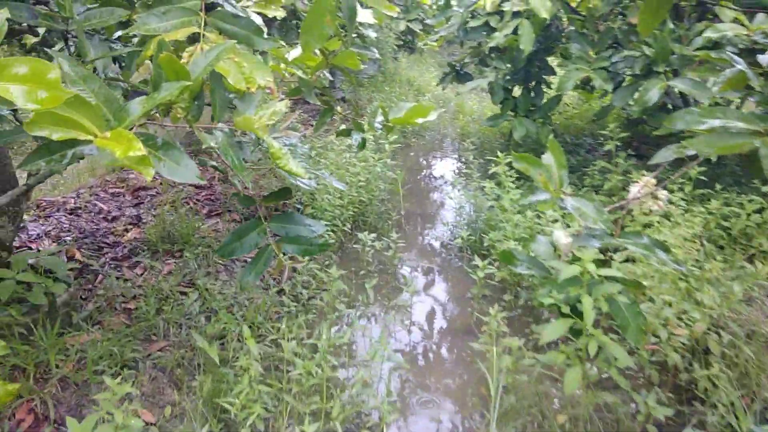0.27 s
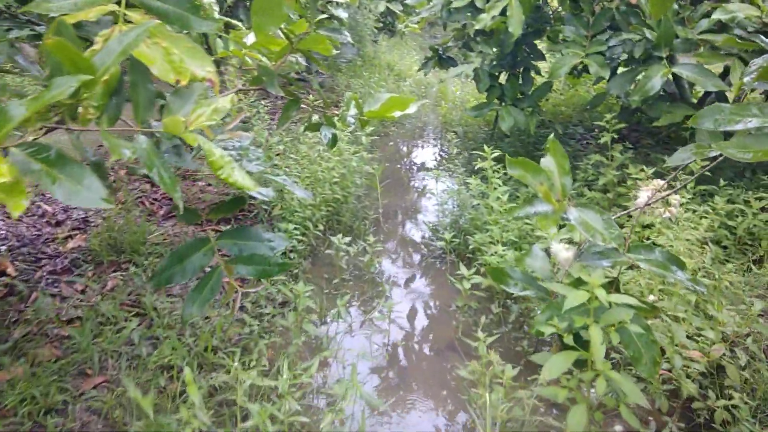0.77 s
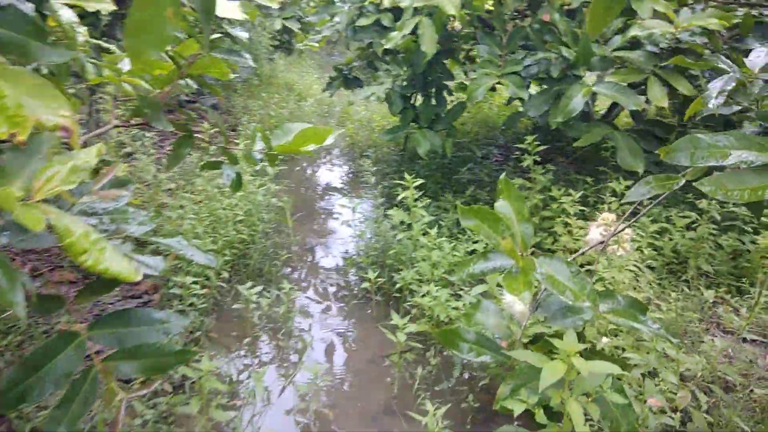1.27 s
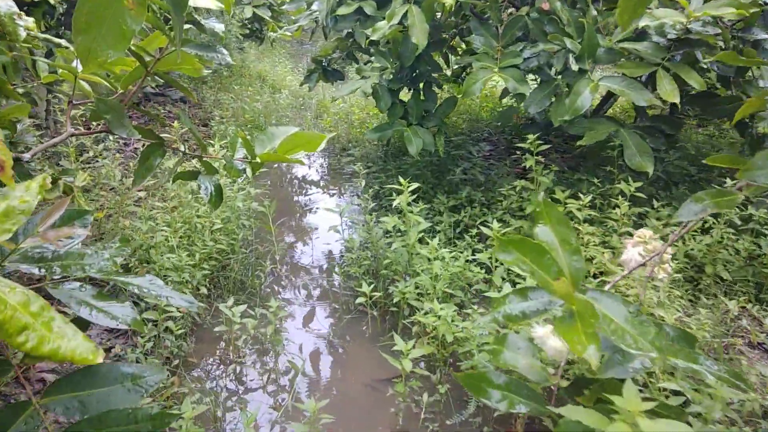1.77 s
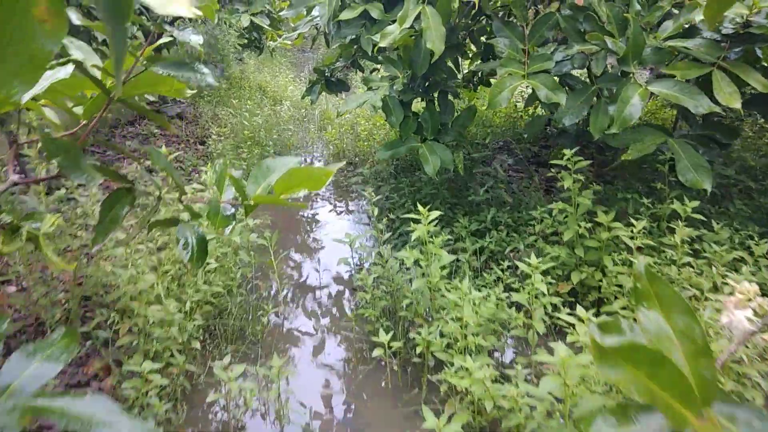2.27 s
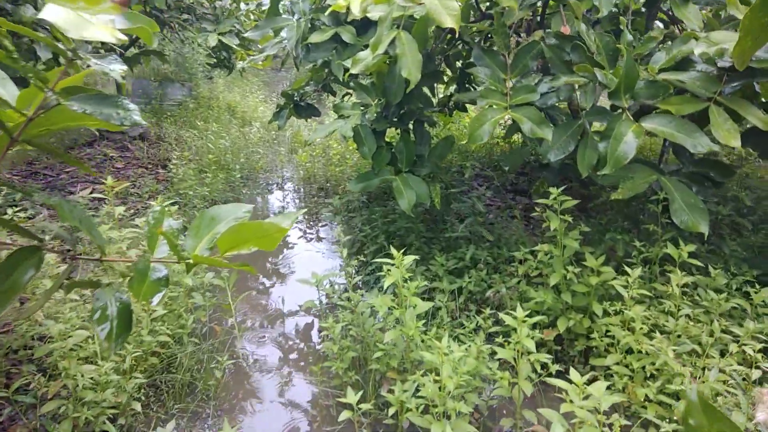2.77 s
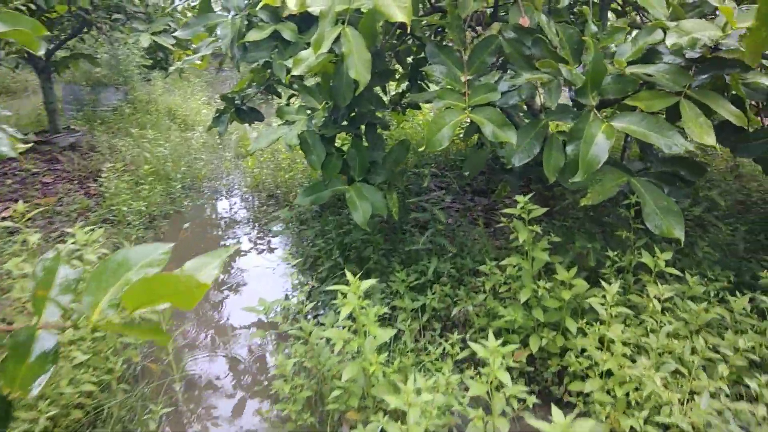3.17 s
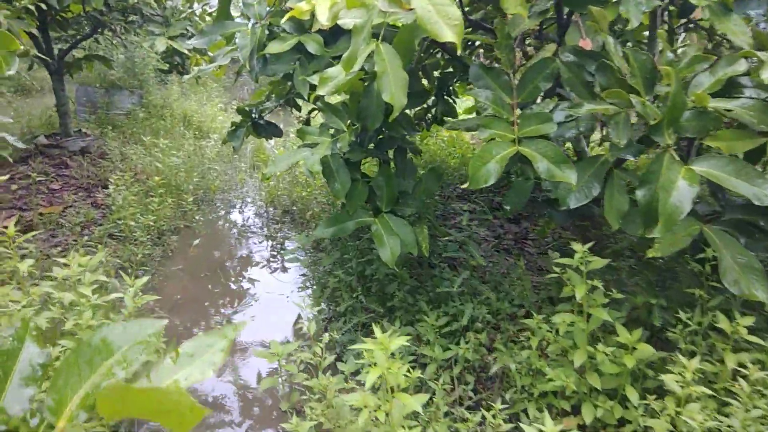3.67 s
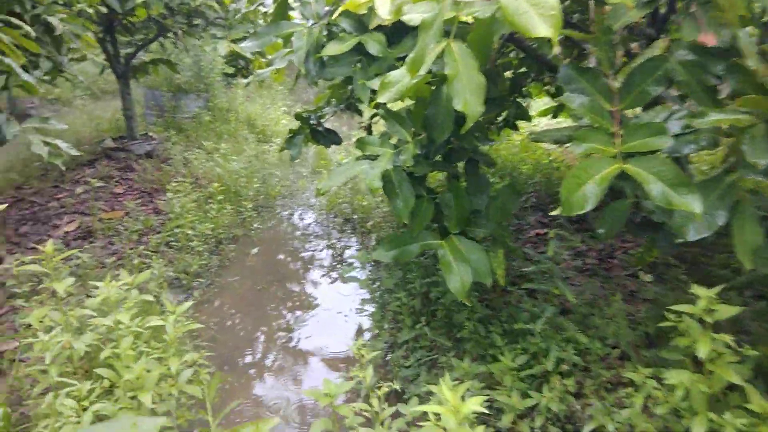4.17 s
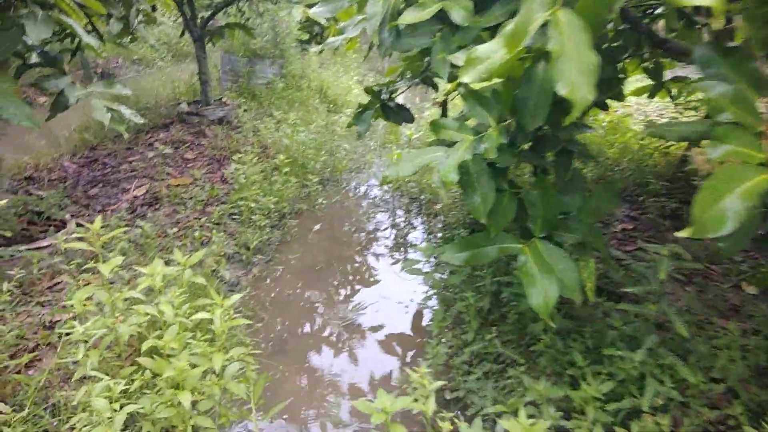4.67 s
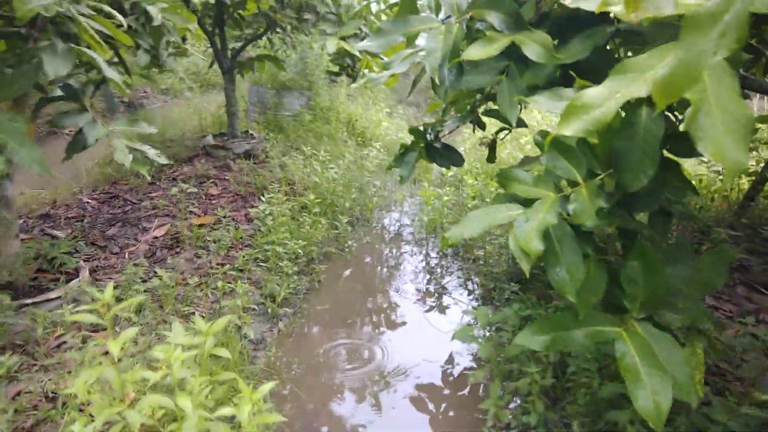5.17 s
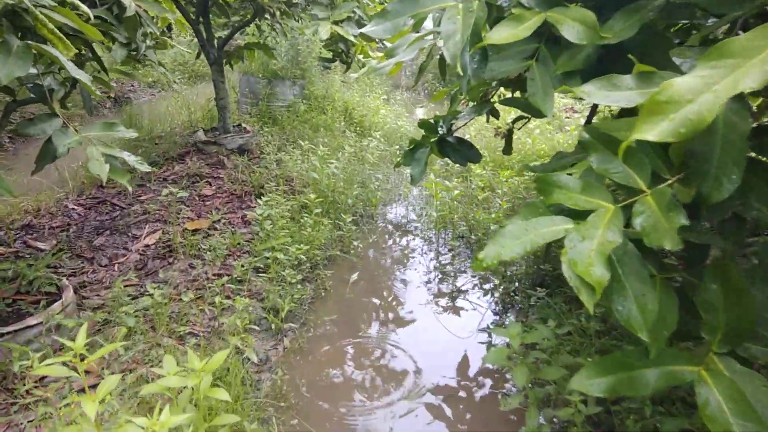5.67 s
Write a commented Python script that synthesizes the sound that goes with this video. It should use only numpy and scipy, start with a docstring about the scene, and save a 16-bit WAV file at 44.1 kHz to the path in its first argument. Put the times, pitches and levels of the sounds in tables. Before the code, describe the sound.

Six seconds of wading in a flooded, leafy garden, heard close to the feet in stereo. The tail of one stride swishes at the start with a few hollow bubbles, while a distant bird gives faint, low, sinking coos until about 1 s. A strong splash comes near 0.9 s, with bright bubble pops and a sharp drop snap. Further strides follow around 1.7, 2.8, 3.9, 4.8 and 5.6 s: each sucks loose with rising bloops, drags through water and weeds in a fine fizzy spray, then plunges with a low gulp. The stride from 2.7 to 3.3 s is full and splashy; sharp splashes spike near 4.07 and 5.06 s. Tiny wet rustles fill the quieter gaps near 1.4, 2.5, 3.4 and 4.5 s. A very high, throbbing insect buzz is clearest from 1 to 2.6 s, then weakens. Faint air and low rumble remain beneath, swelling slightly near 2.8 s.

```python
"""Wading a flooded garden furrow

Someone wades along a flooded garden furrow, about one stride a second, carrying a two-port microphone.
Each foot sucks out with hollow bubbles (gliding sines), drags through water and wet weeds in a spray of
tiny grains (clicks ringing resonators) and plunges in; drops snap and stems rustle (bands of noise).
An insect buzzes high up (pulsed resonant noise), a far bird coos low at the start (a blurred sine),
and a faint outdoor rumble (resonant noise) and air (noise in bands) lie below."""
import sys
import numpy as np
from scipy import signal
from scipy.io import wavfile

SR = 44100
rng = np.random.default_rng(int(sys.argv[2]) if len(sys.argv) > 2 else 0)


def store_pcm(level_fs):
    """Save levels as 16-bit WAV."""
    pcm = np.round(np.clip(level_fs, -1, 1) * 32767).astype(np.int16)
    wavfile.write(sys.argv[1], SR, np.atleast_2d(pcm).T)


def gain_from_db(level_db):
    """Convert decibel levels to linear amplitude factors (20 dB per decade)."""
    decades = np.asarray(level_db, float) / 20
    return 10 ** decades


N = 261072

# Strides: the foot dragging through water and weeds, close below the microphone.
# Each row: full at seconds, level in dB, rise in s, hold in s, fall in s; rise and fall span 20 dB.
STRIDES = [(0, -41.5, .1, 0.16, 0.12), (0.643, -44.5, 0.055, 0.49, 0.15), (1.659, -42.5, 0.088, 0.4, 0.16),
           (2.698, -38.5, 0.0043, 0.43, 0.2), (3.774, -39.5, 0.027, 0.28, 0.18),
           (4.713, -40, 0.12, 0.33, 0.17), (5.626, -43.5, 0.13, 0.32, .15)]
# Splashes and swishes within the strides. Each row: full at seconds, level in dB, rise in s, fall in s.
SPLASHES = [(.8, -42.5, 0.14, 0.071), (0.895, -28, 0.021, 0.11), (1.109, -48, 0.015, 0.016),
            (1.235, -46, 0.002, 0.021), (1.589, -49.5, 0.035, .2), (1.785, -34.5, 0.13, 0.092),
            (2.08, -36.5, 0.12, 0.064), (2.575, -56.5, 0.004, 0.6), (2.86, -39, 0.17, 0.15),
            (3.12, -34.5, 0.16, 0.015), (3.66, -56, 0.036, 0.54), (4.069, -31, 0.001, 0.014),
            (4.198, -45.5, 0.002, 0.034), (4.733, -40, 0.004, 0.28), (5.06, -27.5, 0.002, 0.0097),
            (5.515, -50.5, 0.034, .3), (5.647, -34, 0.062, 0.036), (5.813, -36.5, 0.011, 0.092)]
# Gain of the fine spray, before the force of the drag alters it. Each row: time in seconds, gain in dB.
FINE_SPRAY = [(0, -2.5), (.7, -0.5), (1.9, 1), (3, -.5), (4, 0.5), (4.8, -2), (5.7, 0)]
# Spectrum of the water grains. Each row: frequency in Hz, relative density in dB per Hz.
GRAIN_SPECTRUM = [(1400, -7), (3000, -5), (5000, -1.5), (7500, -3), (10000, -3.5), (12000, -4), (15500, -5)]
# Air sloshing round the foot. Each row: full at seconds, level in dB, rise in s, hold in s, fall in s.
SLOSHES = [(0, -53.5, 0.19, 0.016, 0.086), (0.55, -60, 0.0054, 0.11, 0.09),
           (0.889, -40, 0.0046, 0.012, 0.11), (1.43, -62, .003, 0.2, 0.24),
           (1.767, -40.5, 0.0029, 0.0045, 0.14), (1.999, -47.5, 0.06, 0.031, 0.15),
           (2.552, -49, 0.11, 0.31, 0.16), (2.803, -44, 0.032, 0.013, 0.59),
           (3.619, -47, 0.018, 0.23, 0.037), (3.864, -41.5, 0.0018, 0.057, 0.22),
           (4.07, -61.5, 0.045, 0.095, 0.12), (4.585, -46, 0.11, 0.42, 0.21),
           (5.475, -43, 0.032, 0.33, 0.29)]
# Big air pockets as the foot plunges or pulls free.
# Each row: full at seconds, level in dB, rise in s, fall in s.
PLUNGES = [(0.921, -48, 0.081, 0.14), (1.985, -65.5, 0.019, 0.18), (2.818, -54, 0.036, 0.16),
           (3.877, -43, 0.0063, 0.18), (4.709, -48.5, 0.092, 0.1), (5.66, -47.5, 0.11, 0.13)]
# The far bird, one row a coo. Each row: full at seconds, level in dB, pitch in Hz.
COOS = [(0, -59, 358), (.23, -54.5, 346), (0.549, -53, 338), (0.862, -53.5, 328)]
# The insect's slow swell. Each row: time in seconds, level in dB.
INSECT_LEVEL = [(0, -93), (.5, -68.5), (1.0, -57.5), (2.6, -59), (3.5, -67), (5.92, -71.5)]
# Spectrum of the outdoor air. Each row: frequency in Hz, relative density in dB per Hz.
AIR_SPECTRUM = [(30, -3), (60, 4), (150, 8.5), (300, -16), (500, -16.5), (1300, -16), (2000, -14),
                (5000, -14.5), (8000, -7), (11000, -14)]
# Low swells of the rumble. Each row: full at seconds, level in dB.
SWELLS = [(0.801, -65.5), (2.258, -56.5), (2.8, -51.5), (3.43, -64.5), (3.912, -63), (4.74, -66),
          (5.8, -69.5)]
# Large single bubbles near the feet. Each row: start in seconds, starting level in dB, pitch in Hz.
BUBBLES = [(0.051, -49, 1330), (0.103, -36.5, 1450), (0.126, -47.5, 407), (0.162, -38.5, 1380),
           (0.203, -41, 1067), (0.286, -46, 1025), (0.535, -53.5, 880), (0.572, -41, 1006),
           (0.59, -39, 808), (0.798, -26, 1677), (0.861, -36.5, 1340), (0.904, -24.5, 1474),
           (1.004, -35.5, 977), (1.094, -42, 960), (1.436, -44, 1346), (1.437, -49, 757), (1.52, -45, 758),
           (1.689, -35, 1188), (1.772, -33.5, 562), (1.987, -38.5, 534), (2.038, -33.5, 1087),
           (2.449, -47.5, 850), (2.51, -43.5, 940), (2.583, -29, 667), (2.71, -40, 474), (2.745, -32, 1620),
           (2.837, -39, 336), (2.999, -31.5, 1380), (3.106, -29, 1283), (3.218, -34, 1364),
           (3.622, -37.5, 642), (3.644, -35, 689), (3.697, -40.5, 985), (3.596, -48, 1080),
           (3.61, -42.5, 1056), (3.718, -41.5, 630), (3.91, -29.5, 864), (3.959, -32, 710),
           (4.028, -34, 774), (4.422, -48.5, 1340), (4.489, -43, 1376), (4.541, -45, 1015),
           (4.612, -34, 464), (4.637, -30, 389), (4.205, -46, 1310), (4.597, -36.5, 638),
           (4.716, -47, 1090), (4.739, -36, 1140), (4.789, -34.5, 1205), (4.79, -37.5, 542),
           (4.917, -34, 763), (5.001, -37, 860), (5.059, -31.5, 862), (5.017, -38, 756), (5.139, -36, 938),
           (5.376, -40.5, 1063), (5.466, -35, 724), (5.49, -34, 780), (5.518, -36, 380), (5.577, -35, 760),
           (5.619, -31.5, 681), (5.758, -33, 720)]
# Drops and snapping water films. Each row: start in seconds, level of the snap in dB, pitch of the ring in Hz.
DROPS = [(0.19, -24, 3780), (0.751, -19.5, 2860), (0.866, -25, 3560), (0.8907, -17, 3130),
         (0.9003, -30, 4760), (0.907, -26, 1960), (0.9172, -11, 4850), (1.1104, -23.5, 7100),
         (1.231, -46, 3550), (2.0236, -25, 3400), (2.0483, -24.5, 3320), (2.6937, -34, 3670),
         (2.725, -46, 3670), (2.796, -20, 3940), (2.871, -25, 1885), (2.999, -25, 1990), (3.016, -19, 3390),
         (3.175, -27, 3800), (3.22, -32, 2600), (3.0557, -23.5, 3600), (3.1254, -22, 2350),
         (3.24, -28, 2090), (3.277, -33, 2015), (4.048, -24, 2400), (4.07, -25, 1890), (4.2, -37, 6040),
         (4.7334, -19, 5170), (4.816, -19.5, 4570), (4.871, -19, 6070), (4.971, -32, 2590),
         (5.019, -19, 3700), (5.048, -28, 4600), (5.0583, -21.5, 4300), (5.637, -27, 3670),
         (5.8088, -25.5, 3350)]
# Long gliding bubbles. Each row: start in seconds, starting level in dB, starting pitch in Hz,
# mean pitch change as a share (twice that at the end), time to die by 60 dB in s.
GLIDES = [(1.243, -40, 1248, 0.099, 0.064), (3.878, -31, 301, -0.33, 0.052),
          (3.925, -27.5, 265, 0.21, 0.03), (4.688, -39, 408, -0.44, 0.05), (5.12, -42.5, 676, 0.35, 0.1),
          (5.655, -38, 434, -0.45, 0.055)]
# Small rustles, mostly between strides.
# Each row: start in seconds, level of the hiss in dB, centre in Hz, time to die by 60 dB in s.
RUSTLES = [(1.362, -64.5, 2970, 0.27), (1.493, -63, 3210, 0.29), (2.495, -69, 2920, 0.38),
           (2.534, -59.5, 3940, 1), (2.573, -60, 6600, .6), (3.334, -55, 4860, 0.29),
           (3.599, -62, 2370, 0.3), (3.615, -65.5, 4150, 0.72), (3.626, -67.5, 3330, 1),
           (5.415, -66, 3900, 0.88), (4.489, -48.5, 5090, 0.14), (4.491, -58, 1470, 0.26)]
# Echoes off banks and trunks. Each row: delay in seconds, level in dB.
ECHOES = [(0.009, -9.5), (0.021, -17.5), (0.043, -19)]
# How alike the two ports hear. Each row: frequency in Hz, left-right likeness (1 same, -1 opposed).
PORT_LIKENESS = [(60, 1), (180, 0.88), (550, 0.88), (1650, 0.41), (4970, -0.14), (15000, 0.08)]
# Balance of the two ports. Each row: frequency in Hz, left minus right in dB.
PORT_BALANCE = [(60, 13.5), (130, -5.5), (290, 1.5), (640, -1), (1410, -1.5), (3100, 8), (6820, 4),
                (15000, -0.5)]

DRIP_DB = -90   # the drag never quite stops
FALL_CURVE = 1.71   # falls start gently and steepen: power of time
FINE_PER_DB, FINE_MOST_DB = 1.2, 1   # a gentler drag is finer: gain per dB, limit
COO_RISE_S, COO_FALL_S, COO_BETWEEN_DB, COO_END_S = .07, .15, -85, 1.02
INSECT_HZ, INSECT_SAG_HZ = 9755, 330   # at the height of a throb; lower between throbs
PULSES_PER_S, THROBS_PER_S = 118, 7.5   # on average
AIR_DB = -74
RUMBLE_HZ, SWELL_RISE_S, SWELL_FALL_S, SWELL_BED_DB = 156.8, .19, .1, -79
BUBBLE_RING = 4.57   # ring time in s times pitch in Hz to the power .68
RUSTLE_WIDTH = .1   # half band, share of the centre
DIP_HZ, DIP_WIDTH_HZ, DIP_SHARE = 8900, 1000, .55
BASS_CUT_HZ = 151


def rms_one(x):
    """Scale to rms 1."""
    return x / np.sqrt(np.mean(x ** 2) + 1e-20)


def common_rms_one(pair):
    """Scale a pair of ports so that their mean has rms 1."""
    return pair / np.sqrt(np.mean(pair.mean(0) ** 2))


def in_time(rows):
    """Second column of a curve table, one value a sample."""
    s, value = np.transpose(rows)
    return np.interp(np.arange(N) / SR, s, value)


def at_hz(points, hz):
    """Read a spectrum table on a log-frequency axis."""
    table_hz, value = np.transpose(points)
    return np.interp(np.log(hz), np.log(table_hz), value)


def drift(rate):
    """Slow chance with spread 1: noise under a two-pole lowpass at rate Hz, made at every 40th sample."""
    r = np.exp(-80 * np.pi * rate / SR)
    white = rng.standard_normal(N // 40 + 2002)
    slow = signal.lfilter([1], [1, -2 * r, r * r], white)[2000:]   # settled
    return np.interp(np.arange(N) / 40, np.arange(len(slow)), rms_one(slow))


def ring(clicks, hz, t60):
    """A resonator: a unit click sets a sine of height 1 ringing, down 60 dB after t60 s."""
    r, w = gain_from_db(-60 / (t60 * SR)), 2 * np.pi * hz / SR
    return signal.lfilter([0, np.sin(w)], [1, -2 * r * np.cos(w), r * r], clicks + 1e-18)


def ports(pair, hz):
    """The two ports hear a common and an opposed part, shared out and balanced according to pitch."""
    side = np.array([[1], [-1]])
    alike = np.clip(at_hz(PORT_LIKENESS, hz), -1, 1)
    both = np.sqrt(1 + alike) * pair[0] + np.sqrt(1 - alike) * pair[1] * side
    return both * gain_from_db(at_hz(PORT_BALANCE, hz) / 2 * side)


def surges(bed_db, s, level_db, rise, hold, fall):
    """Level in dB of overlapping surges on a bed: each rises, holds and falls ever faster; powers add."""
    t, power = np.arange(0, N + 64, 64) / SR, gain_from_db(2 * bed_db)
    for s, level_db, rise, hold, fall in np.broadcast(s, level_db, rise, hold, fall):
        early = np.maximum(s - t, 0) / rise
        late = np.maximum(t - s - hold, 0) / fall
        power = power + gain_from_db(2 * np.maximum(level_db - 20 * (early + late ** FALL_CURVE), -200))
    return np.interp(np.arange(N) / SR, t, 10 * np.log10(power))


def peaked(bed_db, rows):
    """Surges without a hold."""
    s, level_db, rise, fall = np.transpose(rows)
    return surges(bed_db, s, level_db, rise, 0, fall)


def add_bubble(out, s, level_db, hz, t60, glide, phases):
    """One bubble: a quick swell, then a dying sine whose pitch glides, mostly upward as it nears the surface."""
    t = np.arange(int(t60 * SR)) / SR
    turn = 2 * np.pi * hz * (t + glide * t ** 2 / t60)
    shape = gain_from_db(level_db - 60 * t / t60) * (1 - np.exp(-t * hz * .7))
    wave = ports(shape * np.sin(turn + 2 * np.pi * phases[:, None]), hz)
    start = round(s * SR)
    out[:, start:start + len(t)] += wave[:, :N - start]


def spatters(per_s, size_db, fade_s):
    """Gain of the grains: sudden little bursts that fade within milliseconds."""
    sizes = gain_from_db(size_db * np.minimum(rng.exponential(1, N), 4))
    starts = (rng.random(N) < per_s / SR) * sizes
    return 1 + signal.lfilter([1], [1, -np.exp(-1 / (fade_s * SR))], starts + 1e-18)


def grains(low_hz, high_hz, per_s, cycles, size_db, patch_db, bursts, count):
    """Tiny bubbles: random clicks dealt to resonators spread in log pitch; common part has rms 1."""
    born = rng.random((2, N)) < per_s / SR
    sizes = gain_from_db(size_db * np.minimum(rng.exponential(1, (2, N)), 5)) * rng.choice([-1, 1], (2, N))
    clicks = bursts * sizes * born
    dealt, out = rng.integers(0, count, (2, N)), 0
    for k, hz in enumerate(np.geomspace(low_hz, high_hz, count)):
        soft = ring(clicks * (dealt == k), hz, cycles / 3 / hz)   # a bubble swells, it is not struck
        ringing = rms_one(ring(soft, hz, cycles / hz))
        patch = gain_from_db(at_hz(GRAIN_SPECTRUM, hz) + patch_db * drift(8.6))
        out = out + patch * np.sqrt(hz) * ports(ringing, hz)
    bass_cut = signal.butter(4, .8 * low_hz, "high", fs=SR, output="sos")
    return common_rms_one(signal.sosfilt(bass_cut, out))


def gurgle(low_hz, high_hz, count, cycles, size_db, rise):
    """A swarm of gliding bubbles at random moments and pitches; common part has rms 1."""
    out = np.zeros((2, N))
    for when, pitch, size, glide, *phases in rng.random((count, 6)):
        hz = low_hz * (high_hz / low_hz) ** pitch
        level_db = -size_db * np.log(size + .05)
        add_bubble(out, when * N / SR, level_db, hz, cycles / hz, rise * glide, np.array(phases))
    return common_rms_one(out)


def wading():
    """Four sizes of air and water: fine spray, fizz, slosh bubbles and the big air pockets of the plunge."""
    stride_db, splash_db = surges(DRIP_DB, *np.transpose(STRIDES)), peaked(DRIP_DB, SPLASHES)
    drag_db = 10 * np.log10(gain_from_db(2 * stride_db) + gain_from_db(2 * splash_db))
    fine_db = in_time(FINE_SPRAY) + np.clip(FINE_PER_DB * (-29.5 - drag_db), -FINE_MOST_DB, FINE_MOST_DB)
    slosh_db, plunge_db = surges(-83, *np.transpose(SLOSHES)), peaked(-78.5, PLUNGES)
    # a gentle drag rustles in patches, a hard one evenly
    patch_db = .5 + np.clip(.2 * (-43 - drag_db), 0, 7)
    bursts = spatters(per_s=45, size_db=.5, fade_s=.002)

    spray = grains(5570, 15440, per_s=11000, cycles=27, size_db=-1, patch_db=patch_db, bursts=bursts, count=14)
    fizz = grains(1422, 5070, per_s=2500, cycles=23.3, size_db=1, patch_db=patch_db, bursts=bursts, count=12)
    froth = grains(484, 1356, per_s=1400, cycles=11.5, size_db=3.5, patch_db=4, bursts=bursts, count=8)
    churn = grains(215, 353, per_s=440, cycles=6.7, size_db=5, patch_db=9, bursts=bursts, count=4)
    slosh = .63 * froth + .27 * gurgle(407.7, 1366, count=1000, cycles=37, size_db=6.5, rise=.33)
    plunge = .8 * churn + .4 * gurgle(200, 460, count=200, cycles=14, size_db=3, rise=.15)

    drag = gain_from_db(drag_db) * (gain_from_db(fine_db) * spray + .87 * fizz)
    return drag + gain_from_db(slosh_db) * slosh + gain_from_db(plunge_db) * plunge


def bird():
    """A soft low coo, repeated and sinking in pitch: a wavering sine blurred by distance and leaves."""
    s, level_db, hz = np.transpose(COOS)
    t = np.arange(N) / SR
    coo_db = surges(COO_BETWEEN_DB, s, level_db, COO_RISE_S, 0, COO_FALL_S)
    sounding = np.clip((COO_END_S - t) / .1, 0, 1)
    wavering_hz = np.interp(t, s, hz) * (1 + .012 * drift(8))
    blur = .8 + .55 * (drift(14) + 1j * drift(14))   # smears level and phase
    coo = np.real(blur * np.exp(2j * np.pi * np.cumsum(wavering_hz) / SR))
    return sounding * gain_from_db(coo_db) * coo


def body_resonance(hz):
    """The insect's narrow body resonance: noise through two resonators just below and above hz."""
    return ring(ring(rng.standard_normal((2, N)), hz - 70, .013), hz + 70, .013)


def insect():
    """Noise in a narrow body resonance, gated by buckling at a nearly steady rate and throbbing slowly."""
    t = np.arange(N) / SR
    cycle = np.cumsum(PULSES_PER_S * (1 + .03 * drift(5))) / SR
    gate = .8 + np.cos(np.pi * cycle) ** 4
    throb = np.sin(2 * np.pi * THROBS_PER_S * t + 1.1 * drift(1.7))
    high = gain_from_db(5 * throb + 1.5 * drift(6)) * body_resonance(INSECT_HZ)
    low = gain_from_db(-9 - 3 * throb + 2 * drift(12)) * body_resonance(INSECT_HZ - INSECT_SAG_HZ)
    return gain_from_db(in_time(INSECT_LEVEL)) * ports(rms_one((high + low) * gate), INSECT_HZ)


def air():
    """Half-octave bands of faint outdoor noise, lumpy in the bass."""
    edges = 25 * 2 ** np.arange(0, 9.6, .5)
    out, white = 0, rng.standard_normal((2, 2, N))   # neighbouring bands use separate noise
    for k, (low, high) in enumerate(zip(edges, edges[1:])):
        band = signal.sosfilt(signal.butter(2, [low, high], "band", fs=SR, output="sos"), white[k % 2])
        hz = np.sqrt(low * high)
        lumps_db = np.interp(hz, [150, 600], [4, 1.5]) * drift(.97)
        out = out + gain_from_db(at_hz(AIR_SPECTRUM, hz) + lumps_db) * ports(band, hz)
    return gain_from_db(AIR_DB) * rms_one(out)


def rumble():
    """A low hum-like swell: noise through two resonators at one pitch, coming in lumps."""
    tone = ring(ring(rng.standard_normal((2, N)), RUMBLE_HZ, .053), RUMBLE_HZ, .015)
    level_db = surges(SWELL_BED_DB, *np.transpose(SWELLS), SWELL_RISE_S, 0, SWELL_FALL_S)
    return gain_from_db(level_db) * ports(rms_one(tone), RUMBLE_HZ) / np.sqrt(2)


def large_bubbles():
    """The loudest single bubbles, dying sines that ring longer the lower they are, and long gliding ones."""
    out = np.zeros((2, N))
    for (s, level_db, hz), phases in zip(BUBBLES, rng.random((len(BUBBLES), 2))):
        add_bubble(out, s, level_db, hz, BUBBLE_RING / hz ** .68, .25, phases)
    for (s, level_db, hz, change, t60), phases in zip(GLIDES, rng.random((len(GLIDES), 2))):
        add_bubble(out, s, level_db, hz, t60, change, phases)
    return out


def drops():
    """Drops: a short ring, the snap of the water film and a broad tick of five smaller bubbles."""
    out = np.zeros((2, N))
    for (s, level_db, hz), luck in zip(DROPS, rng.random((len(DROPS), 6, 4))):
        add_bubble(out, s, level_db - 3, hz, 43 / hz, .2, luck[0, :2])
        add_bubble(out, s, level_db, 1.5 * hz, 4.5 / hz, .1, luck[0, 2:])   # the film snaps
        for late, pitch, *phases in luck[1:]:
            small_hz = 2000 * 7.5 ** pitch
            add_bubble(out, s + .0023 * late, level_db - 12, small_hz, 34 / small_hz, .1, np.array(phases))
    return out


def rustles():
    """A wet leaf or stem lets go: a narrow crackling hiss that starts with a flick and dies away."""
    out = np.zeros((2, N))
    t = np.arange(round(.4 * SR)) / SR
    flick = 1 + np.exp(-t / .002)
    for s, level_db, hz, t60 in RUSTLES:
        edges = [hz * (1 - RUSTLE_WIDTH), hz * (1 + RUSTLE_WIDTH)]
        band = signal.butter(4, edges, "band", fs=SR, output="sos")
        crackle = .12 + (rng.random(len(t)) < 400 / SR)   # 400 ticks a second over a weak hiss
        hiss = rms_one(signal.sosfilt(band, rng.standard_normal((2, len(t))) * crackle))
        start = round(s * SR)
        out[:, start:start + len(t)] += gain_from_db(level_db - 60 * t / t60) * flick * ports(hiss, hz)
    return out


def with_echoes(single):
    """Dull, delayed copies come back off banks and trunks."""
    out, dull = single.copy(), signal.lfilter([.5], [1, -.5], single)
    for s, level_db in ECHOES:
        lag = round(s * SR)
        out[:, lag:] += gain_from_db(level_db) * dull[:, :-lag]
    return out


def treble_dip(water):
    """A partial dip in the treble: a share of the sound passes through a bandstop filter."""
    edges = [DIP_HZ - DIP_WIDTH_HZ / 2, DIP_HZ + DIP_WIDTH_HZ / 2]
    dipped = signal.sosfilt(signal.butter(2, edges, "bandstop", fs=SR, output="sos"), water)
    return water + DIP_SHARE * (dipped - water)


def scene():
    """Water near the feet, its bubbles and drops echoing, over insect, bird, rumble and air."""
    water = wading() + with_echoes(large_bubbles() + drops()) + rustles()
    return treble_dip(water) + bird() + insect() + air() + rumble()


def roll_off(x):
    """The treble ends steeply here."""
    return signal.sosfilt(signal.butter(12, 15940, fs=SR, output="sos"), x)


def record(dry):
    """The microphone cuts the bass, and a steep filter cuts the top."""
    bass_cut = signal.butter(2, BASS_CUT_HZ, "high", fs=SR, output="sos")
    top_cut = signal.cheby2(12, 60, 16000, fs=SR, output="sos")   # 60 dB down from 16 kHz
    mix = signal.sosfilt(top_cut, signal.sosfilt(bass_cut, dry))
    return roll_off(mix)


dry = scene()
out = record(dry)
store_pcm(out)
```